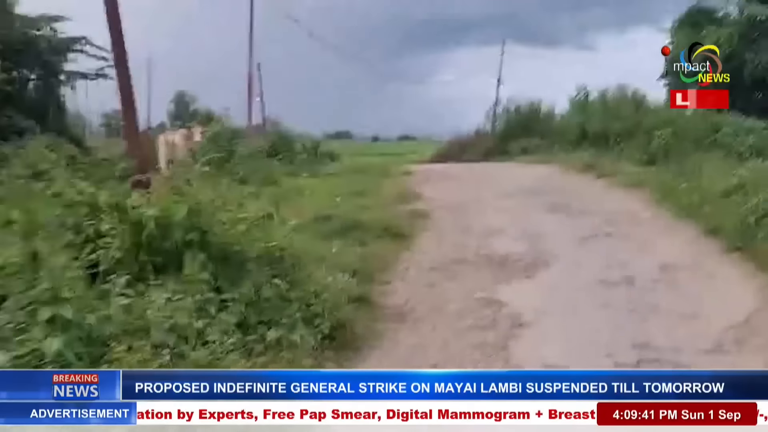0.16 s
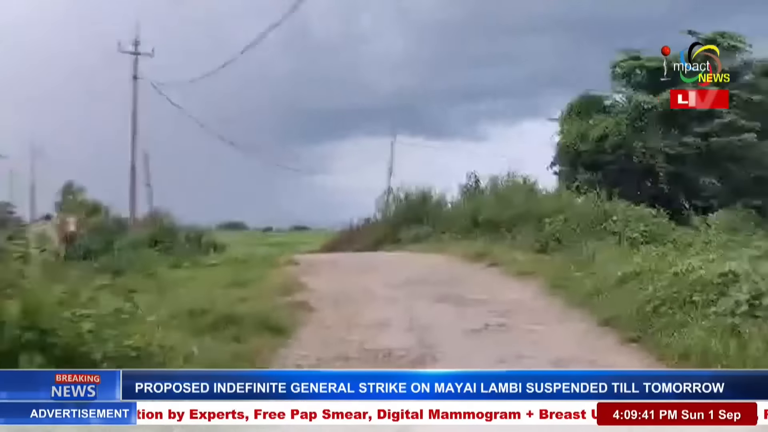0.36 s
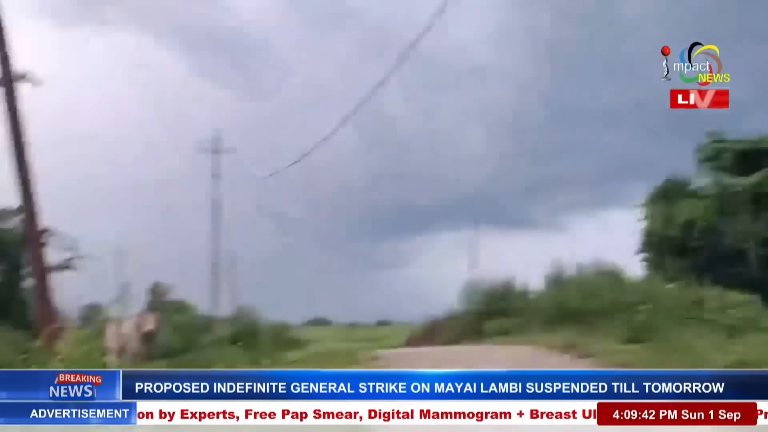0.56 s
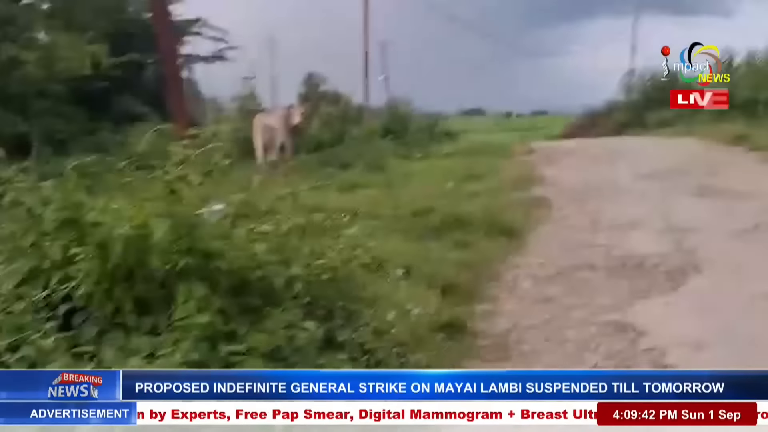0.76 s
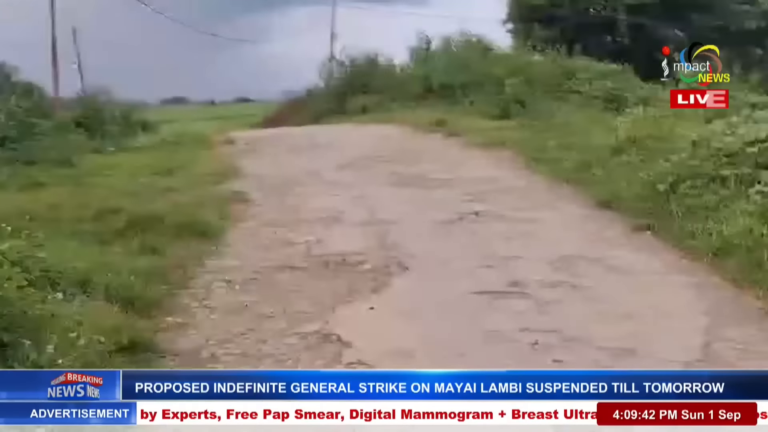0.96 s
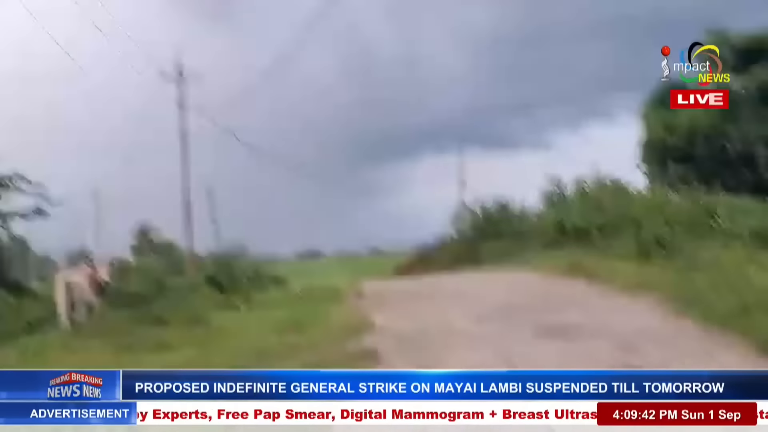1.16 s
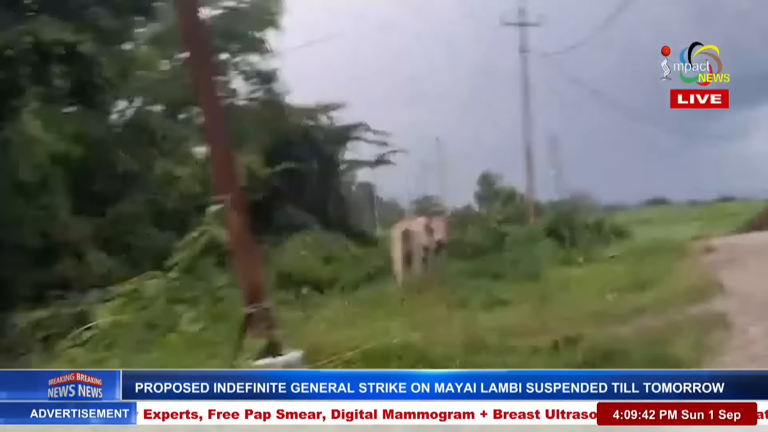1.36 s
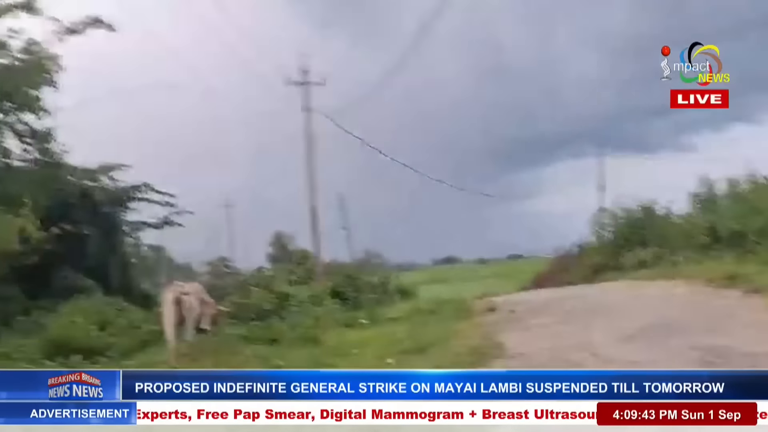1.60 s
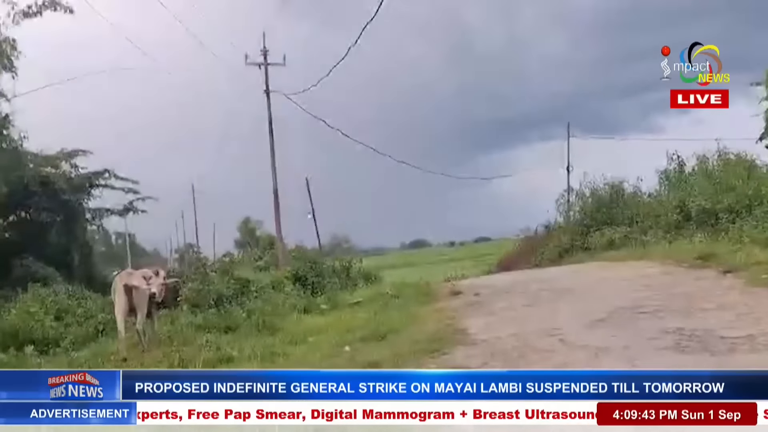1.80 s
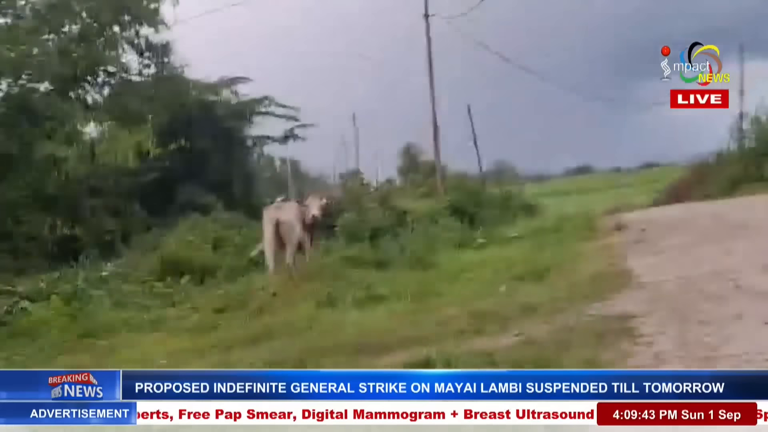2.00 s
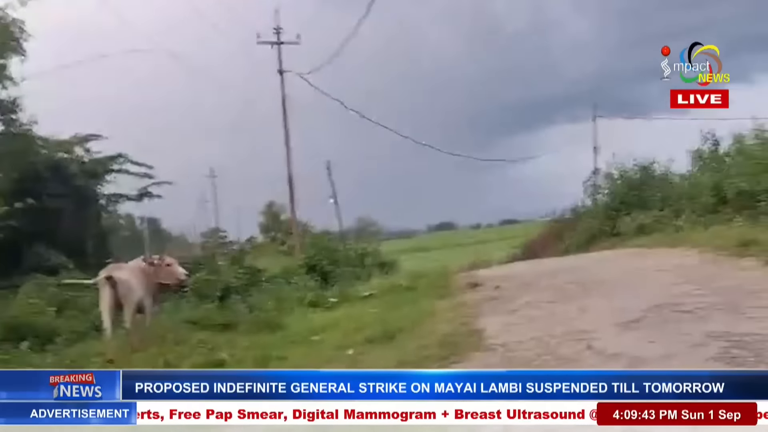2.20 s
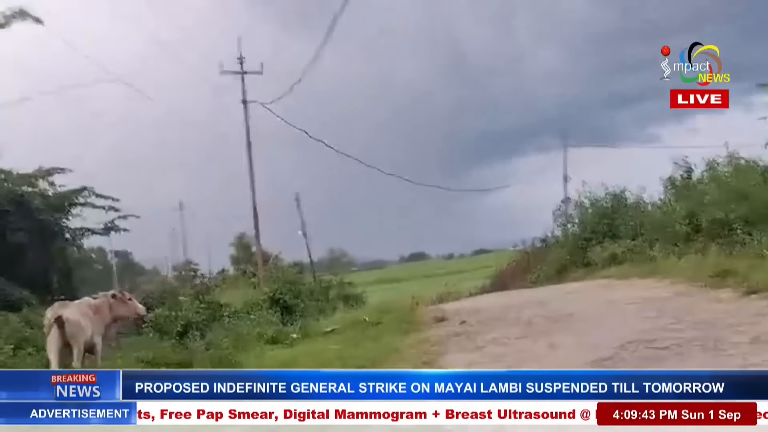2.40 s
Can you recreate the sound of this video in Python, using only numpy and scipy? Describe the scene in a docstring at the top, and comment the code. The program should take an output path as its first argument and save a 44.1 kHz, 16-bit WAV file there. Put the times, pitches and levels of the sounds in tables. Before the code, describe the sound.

Someone walks over gravelly ground outdoors, wind buffeting the microphone, a cow bell clanking late

```python
"""Wind on the microphone comes first, a lumpy rumble with fluttering eddies, then a low thump at 0.12 s. On a
dirt track, phone in hand, someone walks: soles knock and scuff the grit and cloth swishes (shaped noise, short
pulses), and pebbles ping. From about 1.6 s a cow bell clanks nearby, its decaying modes struck by a clapper
while long upper partials waver. A faint far field hush lies under it all."""
import sys
import numpy as np
from scipy import signal
from scipy.fft import rfft, irfft
from scipy.io import wavfile
from scipy.ndimage import uniform_filter1d

SR = 44100
rng = np.random.default_rng(int(sys.argv[2]) if len(sys.argv) > 2 else 0)


def materialize(psi):
    """Save the field psi as 16-bit PCM at rate SR to the path in sys.argv[1].

    A 1-D psi becomes a single channel; in a 2-D psi each row is a channel.
    """
    bounded = np.clip(np.atleast_2d(psi).T, -1, 1)
    quanta = np.round(bounded * 32767).astype(np.int16)
    wavfile.write(sys.argv[1], SR, quanta)


N = 108045  # length [samples]


def gain_of(db):
    """Decibels as an amplitude factor."""
    return 10 ** (np.asarray(db) / 20)


def evened(x):
    """The signal scaled to rms 1."""
    return x / np.sqrt(np.mean(x ** 2) + 1e-20)


def curve(table, column):
    """A table column joined by straight lines over time, for every sample."""
    rows = np.array(table)
    return np.interp(np.arange(N) / SR, rows[:, 0], rows[:, column])


def level(table, column):
    """A table column in dB as a gain for every sample."""
    return gain_of(curve(table, column))


def coloured(x, points):
    """Gives a flat signal the spectrum in points, at rms 1."""
    f, db = np.transpose(points)
    hz = np.fft.rfftfreq(N, 1 / SR)
    # beyond either end of the table the spectrum drops by 30 dB
    shape = gain_of(np.interp(np.log(hz + 1), np.log(f + 1), db, db[0] - 30, db[-1] - 30))
    return evened(irfft(rfft(x) * shape, N))


def smoothed_twice(x, width):
    """Two running means in a row."""
    return uniform_filter1d(uniform_filter1d(x, width), width)


def lumps(seconds, depth_db):
    """Random swelling and sinking as a gain, in lumps about so many seconds long."""
    width = max(round(seconds * SR), 2)
    wander = evened(smoothed_twice(rng.standard_normal(N), width))
    return evened(gain_of(depth_db * wander))


def patchy(x, depth_db):
    """Random loud and soft patches, about 15 ms by 800 Hz: clumps of grit of unlike size."""
    z = signal.stft(x, nperseg=256, noverlap=192)[2]
    field = rng.standard_normal(z.T.shape)
    field = uniform_filter1d(field, size=9, axis=0)  # along time
    field = uniform_filter1d(field, size=5, axis=1).T  # along frequency
    patched = z * gain_of(depth_db * evened(field))
    return evened(signal.istft(patched, nperseg=256, noverlap=192)[1][:N])


def steadied(x, share):
    """Evens out the deep random fades of narrow noise."""
    size = uniform_filter1d(abs(signal.hilbert(x)), 200)
    return evened(x / (size + 0.51) ** share)


def resonate(x, hz, width_hz):
    """A resonance with moving pitch: shifts the curve hz down to zero, smooths twice, and shifts back."""
    turn = np.exp(2j * np.pi * np.cumsum(hz) / SR)
    r = np.exp(-np.pi * width_hz / SR)
    smooth = signal.lfilter([1], np.convolve([1, -r], [1, -r]), x / turn)
    return evened((turn * smooth).real)


def ring(hz, t60, rise_s, seconds):
    """One dying mode with a soft start."""
    t = np.arange(round(seconds * SR)) / SR
    return np.minimum(t / rise_s, 1) * gain_of(-60 * t / t60) * np.sin(2 * np.pi * hz * t)


def pulse(hz, cycles, size):
    """A push of about one cycle: quick rise, barely rising pitch, no ring."""
    turns = hz * np.arange(size) / SR
    swell = turns / cycles * np.exp(1 - turns / cycles)
    return swell * np.sin(2 * np.pi * turns ** 1.02)


def add(mix, s, sound):
    """Lays a sound into the mix from s seconds on."""
    part = mix[round(s * SR):][:len(sound)]
    part += sound[:len(part)]


# hush of the far field: (frequency [Hz], relative density [dB per Hz])
HUSH_SPECTRUM = [(150, -53), (250, 10), (697, -4), (1500, -11), (1600, -9), (2230, -22), (7660, -65),
                 (15900, -34)]
HUSH_DB = -52.5  # rms


def far_hush():
    """Steady noise with the spectrum of the distant open field."""
    return gain_of(HUSH_DB) * coloured(rng.standard_normal(N), HUSH_SPECTRUM)


# wind rumble at the microphone: (time [s], level [dB])
RUMBLE_LEVEL = [(0.0, -61), (0.05, -32.5), (0.09, -33), (0.12, -29.5), (0.23, -48.5), (0.27, -31),
                (0.31, -38), (0.35, -35), (0.37, -38), (0.42, -39), (0.44, -55), (0.48, -37), (0.5, -45),
                (0.71, -33), (0.76, -39.5), (0.78, -26), (0.8, -33.5), (0.9, -30.5), (0.93, -34.5),
                (0.97, -30), (1.04, -86), (1.08, -44), (1.21, -45), (1.25, -32.5), (1.27, -36.5),
                (1.34, -25.5), (1.36, -33), (1.38, -41), (1.4, -33), (1.44, -39), (1.46, -49), (1.49, -39),
                (1.52, -31), (1.55, -33), (1.58, -24.5), (1.67, -87), (1.75, -84), (1.77, -56),
                (1.88, -36.5), (1.93, -38), (1.95, -33), (2.06, -38), (2.07, -45), (2.11, -58), (2.16, -61),
                (2.26, -41), (2.31, -66), (2.35, -37), (2.39, -49.5), (2.45, -47)]
# spectrum of that rumble: (frequency [Hz], relative density [dB per Hz])
RUMBLE_SPECTRUM = [(20, -22), (35, -11), (60, -2), (100, -2.5), (150, -7), (250, -15)]
# eddies at the microphone port: (time [s], level [dB], pitch [Hz])
EDDIES = [(0.0, -52, 298), (0.012, -42, 318), (0.12, -43.5, 200), (0.142, -30, 221), (0.16, -54, 208),
          (0.203, -33, 370), (0.278, -55, 203), (0.3, -27.5, 200), (0.326, -43, 215), (0.365, -47, 202),
          (0.407, -40, 261), (0.443, -50.5, 415), (0.465, -32.5, 434), (0.513, -54.5, 358),
          (0.539, -38, 420), (0.609, -44, 327), (0.639, -30.5, 393), (0.681, -37, 295), (0.725, -34, 467),
          (0.76, -31.5, 430), (0.798, -43, 215), (0.853, -29, 242), (0.903, -41, 197), (0.915, -34.5, 197),
          (0.95, -56, 333), (0.974, -37, 350), (1.02, -33, 444), (1.046, -52, 464), (1.066, -38.5, 406),
          (1.1, -50, 356), (1.158, -52, 211), (1.195, -38.5, 380), (1.238, -56, 362), (1.254, -39, 417),
          (1.288, -33, 285), (1.32, -35, 282), (1.366, -37.5, 370), (1.388, -48, 338), (1.404, -36.5, 276),
          (1.438, -30, 393), (1.461, -36, 383), (1.492, -68, 188), (1.549, -29, 316), (1.578, -23, 297),
          (1.599, -38, 330), (1.645, -26, 330), (1.679, -52, 332), (1.696, -37.5, 445), (1.73, -48, 460),
          (1.784, -51.5, 323), (1.838, -34.5, 418), (1.884, -40, 237), (1.968, -44, 281),
          (2.004, -22.5, 376), (2.025, -39.5, 382), (2.11, -29.5, 252), (2.144, -31, 350),
          (2.164, -47, 386), (2.202, -31.5, 486), (2.223, -48, 310), (2.244, -33, 265), (2.272, -30.5, 288),
          (2.292, -42, 296), (2.357, -34.5, 420), (2.374, -48, 407), (2.45, -44, 496)]
EDDY_LUMP_S, EDDY_LUMP_DB = 0.018, 8
EDDY_WIDTH_HZ, EDDY_WIDE_HZ, EDDY_WIDE_DB = 270, 392, 5  # narrow and wide resonance, wide over narrow


def wind():
    """Lumpy rumble, and eddies across the microphone port that flutter at a wandering pitch."""
    rumble = coloured(rng.standard_normal(N) * lumps(0.0071, 0.76), RUMBLE_SPECTRUM)
    puffs = rng.standard_normal(N) * lumps(EDDY_LUMP_S, EDDY_LUMP_DB)
    hz = curve(EDDIES, 2)
    flutter = resonate(puffs, hz, EDDY_WIDTH_HZ)
    flutter += gain_of(EDDY_WIDE_DB) * resonate(puffs, hz, EDDY_WIDE_HZ)
    # the range below 130 Hz is left to the rumble
    flutter = signal.sosfilt(signal.butter(4, 130, "high", fs=SR, output="sos"), flutter)
    rumble = level(RUMBLE_LEVEL, 1) * steadied(rumble, 0.22)
    return rumble + level(EDDIES, 1) * steadied(evened(flutter), 0.67)


# low heavy thumps of the heel's weight, and shorter slams: # (centre time [s], peak level [dB], pitch [Hz],
# time from centre to 123 dB down [s])
THUMPS_AND_SLAMS = [(0.12, -31, 66.7, 0.045), (0.932, -19, 68.5, 0.039), (0.979, -16, 350, 0.011),
                    (1.341, -20, 57.6, 0.049), (1.641, -17.5, 293, 0.014), (2.113, -21, 176, 0.011)]


def slams():
    """A few low swings, each rising a little in pitch."""
    out, t = np.zeros(N), np.arange(N) / SR
    for s, db, hz, length in THUMPS_AND_SLAMS:
        u = (t - s) / length
        turns = hz * (t - s) * (1 + 0.032 * u)
        out += gain_of(db - 123 * u ** 2) * np.cos(2 * np.pi * turns)
    return out


# short modes of the nearby cow bell: (pitch [Hz], level over blow [dB], 60 dB decay time [s])
BELL_MODES = [(1309, 2.5, 0.086), (2350, -11, 0.05), (5100, -15, 0.027)]
# clapper blows: (time [s], level [dB])
CLAPPER_BLOWS = [(1.602, -31.5), (2.0936, -43), (2.1256, -31.5), (2.155, -30), (2.3433, -29.5),
                 (2.3534, -26.5), (2.4214, -34)]
# long upper partials, mostly in close pairs, kept going by the rattling clapper:
# (pitch [Hz], start time [s], rms level at start [dB], growth [dB per s])
LONG_PARTIALS = [(2859, 2.1, -54, 12), (2947, 1.55, -53, 2), (3268, 1.98, -60.5, 6),
                 (3358, 1.53, -57.5, -1), (3787, 1.66, -63, 2)]
WAVER_S, WAVER_DB = .015, 2.8


def bell():
    """Every blow rings the same short modes; the long partials swell in and waver."""
    out, t = np.zeros(N), np.arange(N) / SR
    for s, blow_db in CLAPPER_BLOWS:
        for hz, db, t60 in BELL_MODES:
            start = s + 0.00056 * rng.random()
            add(out, start, gain_of(blow_db + db) * ring(hz, t60, 0.0022, .4))
    for hz, s, db, growth_db in LONG_PARTIALS:
        # phase walks at random, in turns
        drift = rng.random() + np.cumsum(rng.standard_normal(N)) * np.sqrt(.8 / SR)
        swell = np.clip((t - s) / 0.036, 0, 1) * gain_of(db + growth_db * (t - s))
        tone = np.sqrt(2) * np.sin(2 * np.pi * (hz * t + drift))
        out += swell * lumps(WAVER_S, WAVER_DB) * tone
    return out


# soles scuffing and cloth swishing: (time [s], treble level [dB], mids over treble [dB])
SCUFF_LEVEL = [(0.0, -50.5, 0), (0.02, -55, 9.5), (0.05, -48.5, 11), (0.09, -57.5, 11.5), (0.096, -56, 0),
               (0.116, -46.5, -2), (0.146, -34.5, -2), (0.318, -71.5, 19), (0.332, -59, 13),
               (0.358, -71, 15), (0.418, -38.5, 9.5), (0.444, -52.5, 11), (0.472, -48, 3.5),
               (0.486, -57, 10.5), (0.496, -45.5, 1), (0.512, -58.5, 8), (0.524, -54, 11.5),
               (0.592, -41, 4), (0.744, -43, 7.5), (0.766, -36.5, 1.5), (0.832, -50, 4.5), (0.84, -41.5, 2),
               (0.87, -57, 8), (0.922, -57, 12.5), (0.94, -51.5, 16.5), (0.964, -39, -3.5),
               (0.994, -50.5, 12), (1.002, -46.5, 3), (1.082, -52.5, 9), (1.098, -52, 7.5),
               (1.132, -58.5, 7), (1.2, -58.5, 3.5), (1.262, -60.5, 14.5), (1.288, -83, 35),
               (1.326, -37, 9), (1.38, -36.5, 3), (1.44, -53, 8.5), (1.502, -47.5, 1.5),
               (1.554, -69.5, 17.5), (1.582, -52, 19), (1.596, -55, 11), (1.624, -43, 13.5),
               (1.684, -50.5, 0.5), (1.7, -47.5, 5), (1.772, -57.5, 3.5), (1.83, -43, 3),
               (1.882, -43.5, 2.5), (1.894, -38.5, 0.5), (1.948, -50, 11.5), (2.008, -34, -2),
               (2.172, -55, 12), (2.18, -55, 3), (2.226, -48.5, 10.5), (2.284, -48, 4.5),
               (2.332, -56, 11.5), (2.344, -53, 19), (2.374, -48.5, 2), (2.386, -57, 9.5),
               (2.436, -42.5, -2.5), (2.45, -38.5, 4)]
# treble of the scuffs: (frequency [Hz], relative density [dB per Hz])
TREBLE_SPECTRUM = [(1290, -62), (2200, 0.5), (2800, -3), (3010, 0), (3500, -6.5), (4830, 3), (8200, 2),
                   (10300, -3), (13400, 4), (15900, 0)]
# mids of the scuffs: (frequency [Hz], relative density [dB per Hz])
MID_SPECTRUM = [(300, 2.5), (600, 1), (1000, -0.5), (1600, -1), (2500, -7), (4000, -10), (7000, -41)]
GRAINS_PER_S, GRAIN_SPREAD_DB, GRAIN_SHARE = 4000, 6.5, 0.26
STONES_PER_S, STONE_DECAY_S, STONE_DB = 150, 0.0047, -5.5  # stones that snap under the sole


def strikes(per_s, cap):
    """Random moments, each with a gain of its own; cap limits the rare loud ones."""
    loudness = gain_of(GRAIN_SPREAD_DB * np.minimum(rng.exponential(1, N), cap))
    return loudness * (rng.random(N) < per_s / SR)


def scuffs():
    """Hiss mixed with grains of grit; mids and treble swell together, and snapping stones chop the mids."""
    grit = evened(strikes(GRAINS_PER_S, 4) * rng.standard_normal(N))
    rub = GRAIN_SHARE * grit + (1 - GRAIN_SHARE) * rng.standard_normal(N)
    treble = patchy(coloured(rub, TREBLE_SPECTRUM), 2.4) * lumps(0.0049, 0.96)
    decay = np.exp(-1 / (STONE_DECAY_S * SR))
    snaps = evened(signal.lfilter([1], [1, -decay], strikes(STONES_PER_S, 3)))
    mids = patchy(coloured(rub, MID_SPECTRUM), 3) * evened(1 + gain_of(STONE_DB) * snaps)
    return level(SCUFF_LEVEL, 1) * (treble + level(SCUFF_LEVEL, 2) * mids)


# pebbles flicked away: (time [s], level [dB], pitch [Hz])
PEBBLES = [(0.4936, -38.5, 11100), (0.8397, -36, 12300), (0.9074, -42, 4340), (1.001, -41, 6940),
           (1.0154, -37.5, 8700), (1.584, -51, 4870), (1.899, -45, 4940), (1.9544, -42, 9700),
           (2.3435, -32.5, 5000)]


def pebbles():
    """Short high pings, roughened by noise."""
    out, size = np.zeros(N), 2000
    for s, db, hz in PEBBLES:
        ping = ring(hz, 7 * 0.0027, 0.00012, size / SR)
        add(out, s, gain_of(db) * ping * (1.25 + 0.18 * rng.standard_normal(size)))
    return out


# heel and toe on the track, close below the microphone:
# (time [s], crack level [dB], thud pitch [Hz], thud over crack [dB], crack pitch [Hz], grit over crack [dB])
FOOT_KNOCKS = [(0.096, -25.5, 184, -2.5, 1765, 1), (0.341, -7.5, 238, 2, 1100, -16.5),
               (0.396, -21, 670, -2, 1400, -9), (0.461, -19.5, 456, -11, 1080, -35),
               (0.616, -20.5, 300, -7, 980, -10), (0.645, -18, 335, -1, 1290, -8.5),
               (0.692, -16.5, 444, -3, 825, -9.5), (0.75, -36, 370, 18, 764, -18),
               (0.779, -30.5, 255, 0, 990, 0), (0.802, -27, 211, -21, 1170, 1),
               (0.93, -10.5, 184, -8.5, 565, -17.5), (0.9960, -20.5, 264, -10, 1020, -21),
               (1.26, -22.5, 580, 7, 880, -21), (1.362, -25.5, 484, 8.5, 1260, 2),
               (1.456, -24.5, 296, -13, 760, -15), (1.57, -19, 424, 2, 770, -7),
               (1.577, -22.5, 300, 1.5, 1510, -24), (1.618, -20.5, 395, -1, 1420, -8),
               (1.693, -31.5, 460, 4, 900, -2), (2.13, -28, 440, 3, 1290, -22),
               (2.197, -24.5, 616, 9, 794, -14), (2.2047, -23.5, 407, -20, 1500, -15),
               (2.2538, -22, 387, -3, 1100, -15), (2.342, -37, 466, -4, 1250, -19)]
CRACK_CYCLES, CRACK_AT_S = .55, .0013  # the crack peaks just after first touch
THUD_CYCLES, THUD_LOW = .3, 0.24  # a thud lacks bass below this share of its pitch
SPRAY_HZ, CRUNCH_S = 1800, 0.0034  # treble limit and decay of the grit
ROCK_S, ROCK_DB = 0.00109, -19  # the sole touches lightly just before the crack
REBOUND_S, REBOUND_DB = 0.001667, -10.5  # shortest delay; up to twice as long


def knocks():
    """A light touch, a sharp crack, the thud just after it, a rebound and a crunch of grit."""
    out, t = np.zeros(N), np.arange(2000) / SR
    dull = np.exp(-2 * np.pi * SPRAY_HZ / SR)
    for s, db, thud_hz, thud_db, crack_hz, grit_db in FOOT_KNOCKS:
        turns = crack_hz * (t - CRACK_AT_S)
        crack = np.cos(2 * np.pi * turns) + 0.2 * np.cos(2 * np.pi * 2.15 * turns)
        crack *= np.exp(-(turns / CRACK_CYCLES) ** 2)
        grit = signal.lfilter([1, -1], np.convolve([1, -dull], [1, -.9]), rng.standard_normal(len(t)))
        crunch = grit * np.minimum(t / 0.0045, 1) * np.exp(-t / CRUNCH_S)
        bass_cut = signal.butter(1, THUD_LOW * thud_hz, "high", fs=SR)
        thud = signal.lfilter(*bass_cut, pulse(thud_hz, THUD_CYCLES, len(t)))
        add(out, s - ROCK_S, gain_of(db + ROCK_DB) * crack)
        add(out, s, gain_of(db) * (crack + gain_of(grit_db) * crunch))
        add(out, s + 0.0015, gain_of(db + thud_db) * thud)
        add(out, s + REBOUND_S * (1 + rng.random()), -gain_of(db + REBOUND_DB) * crack)
    return out


def scene():
    """All layers, from the far field to the feet, on one channel."""
    surroundings = far_hush() + wind() + slams() + bell()
    walking = scuffs() + pebbles() + knocks()
    return (surroundings + walking)[None]


def record(dry):
    """The band limit: a steep low-pass at 15850 Hz."""
    lowpass = signal.firwin(511, 15850, window=("kaiser", 9), fs=SR)
    return signal.oaconvolve(dry, lowpass[None], "same")


dry = scene()
out = record(dry)
materialize(out)
```